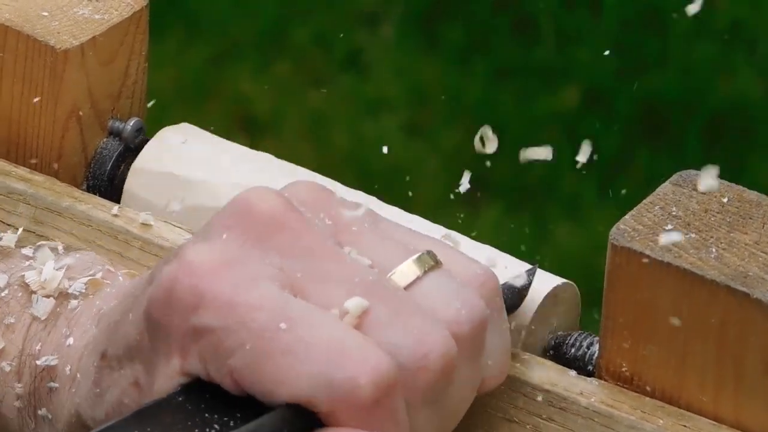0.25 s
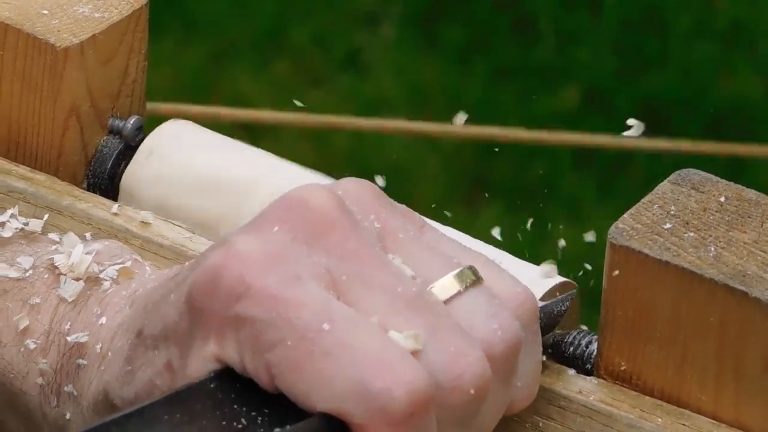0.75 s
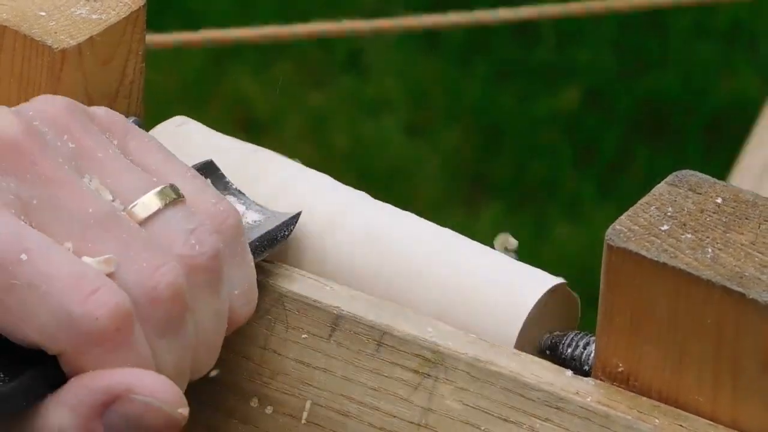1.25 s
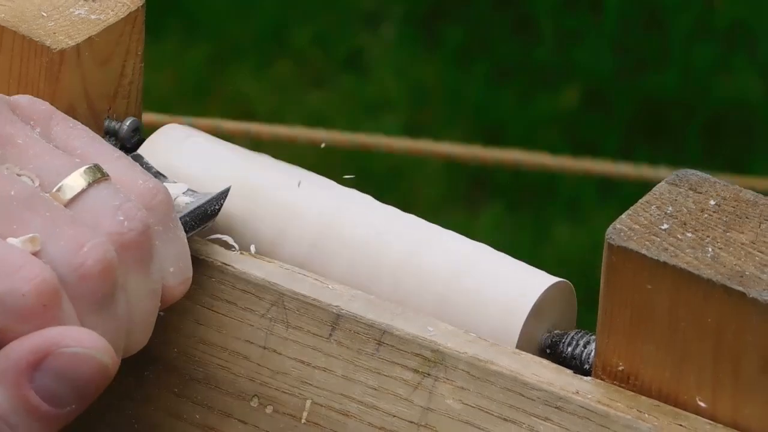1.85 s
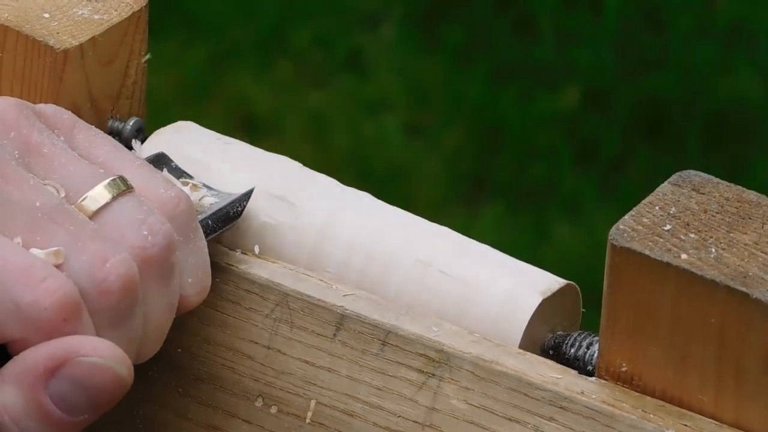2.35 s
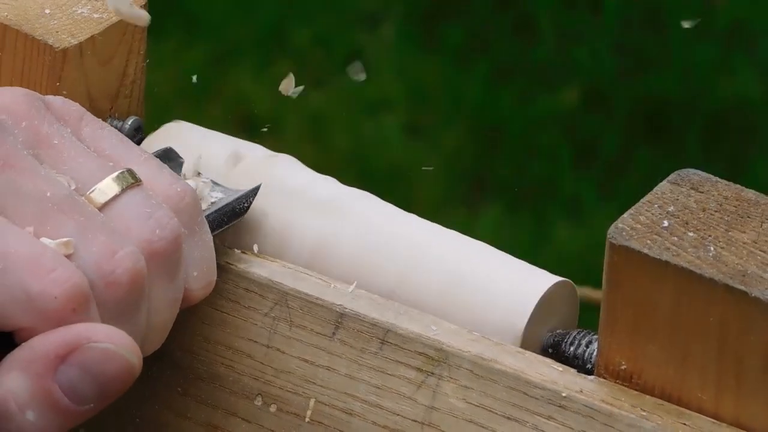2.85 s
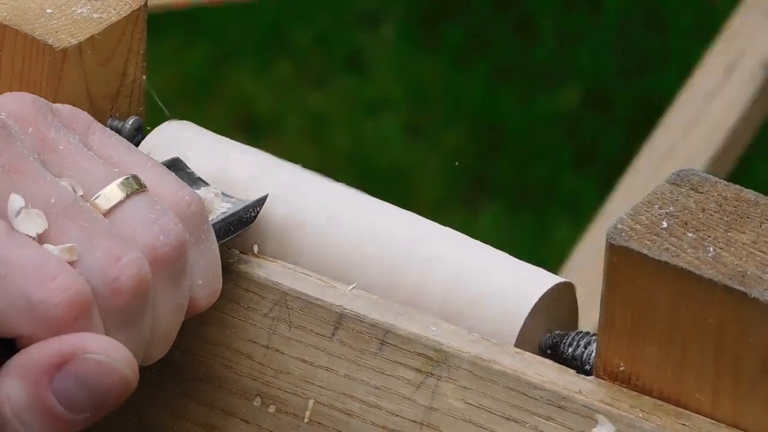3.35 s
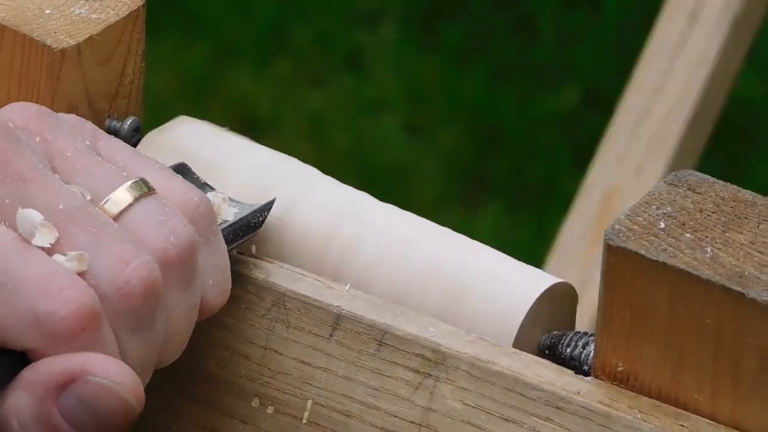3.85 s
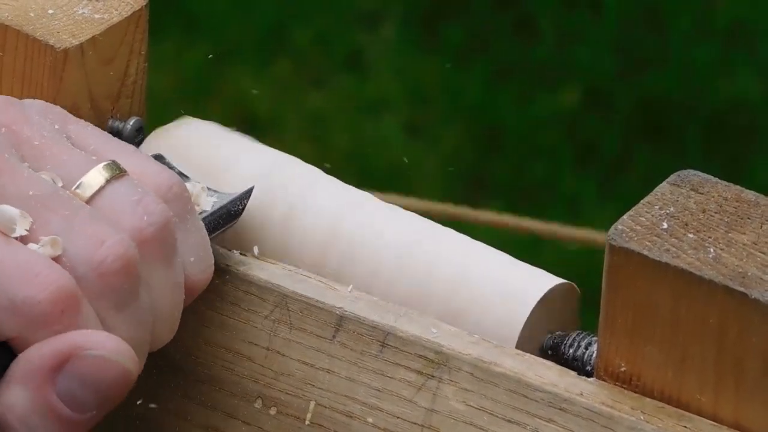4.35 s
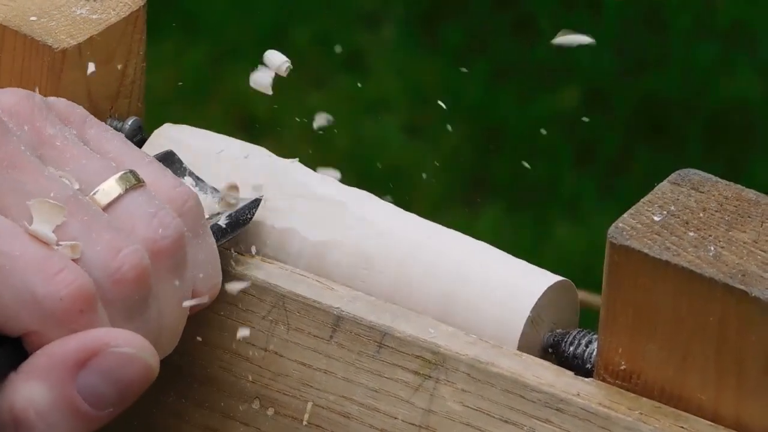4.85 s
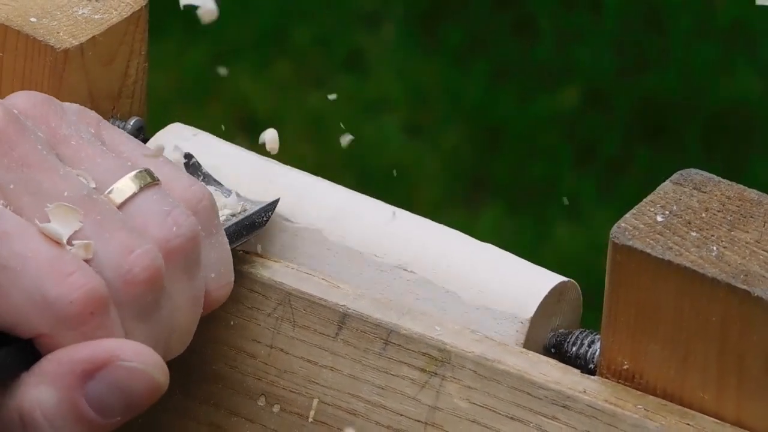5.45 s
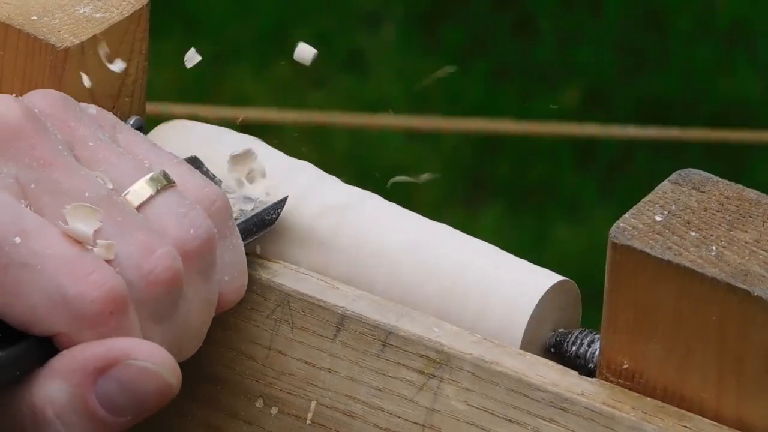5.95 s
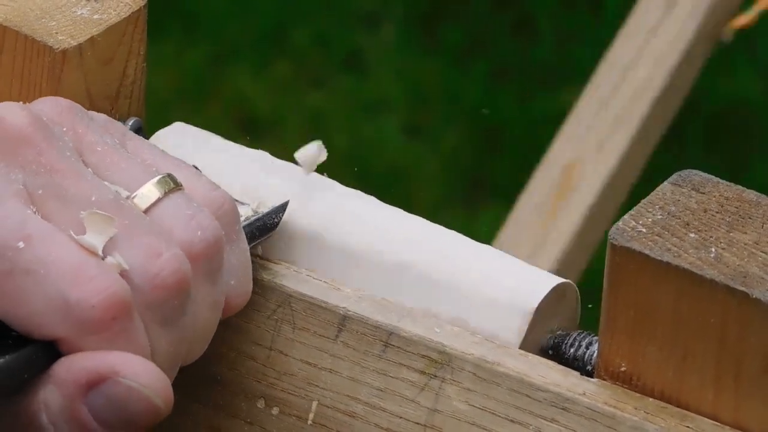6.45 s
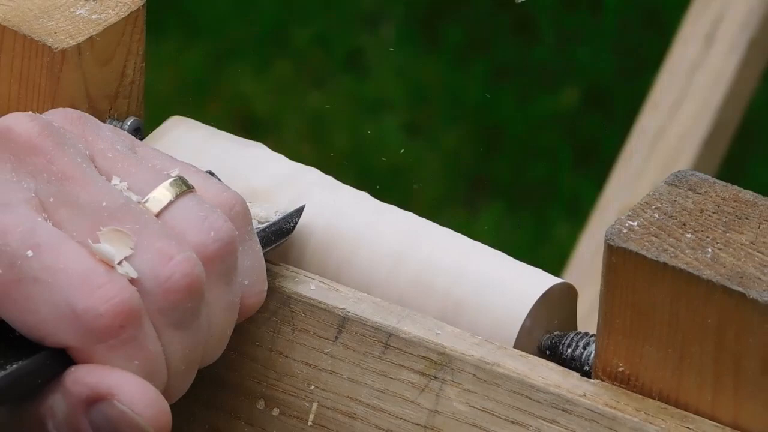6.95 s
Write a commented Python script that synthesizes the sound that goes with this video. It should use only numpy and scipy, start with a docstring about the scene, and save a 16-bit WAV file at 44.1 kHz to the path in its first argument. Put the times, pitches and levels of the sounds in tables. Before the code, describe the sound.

A gouge rasps and crackles in bursts on a spinning wooden blank, with quick knocking taps between cuts, then a power saw swells in.

```python
"""Hand-driven lathe and power saw in a garden

A gouge on a cord-driven lathe: facets bite, chips snap and fibres tear as noise through ringing wood and steel.
On each return stroke a high spot taps the edge once a turn. Chips tick, the blank squeaks; short low thumps
sound now and then. A power saw, leaning left, swells in as filtered noise; its blade later rings as wavering
sines. Shaped noise gives a faint garden rustle."""
import sys
import numpy as np
from scipy import signal
from scipy.fft import rfft, irfft
from scipy.io import wavfile
from scipy.ndimage import uniform_filter1d

SR = 44100
rng = np.random.default_rng(int(sys.argv[2]) if len(sys.argv) > 2 else 0)


def log_audio(samples):
    """Write samples as a 16-bit WAV file to the path given in sys.argv[1]."""
    # one column per channel
    frames = np.atleast_2d(samples).T
    # limit to full scale, then quantise
    limited = np.clip(frames, -1, 1)
    pcm = np.round(limited * 32767).astype(np.int16)
    wavfile.write(sys.argv[1], SR, pcm)


N = 317961
T = np.arange(N) / SR
LEFT_RIGHT = np.array([[1], [-1]])  # opposite signs left and right


def undb(db):
    """Amplitude ratio from dB."""
    return 10 ** (np.asarray(db) / 20)


def unit(x):
    """Scale to rms 1."""
    return x / np.sqrt(np.mean(x ** 2))


def curve(table):
    """Columns of a table, joined by straight lines in time."""
    s, *columns = np.transpose(table)
    return [np.interp(T, s, column) for column in columns]


def ring(x, hz, width_hz):
    """Two-pole resonance, gain 1 at the centre."""
    b, a = signal.iirpeak(hz, hz / width_hz, fs=SR)
    return signal.lfilter(b, a, x)


def band(x, lo_hz, hi_hz):
    """Band-pass: small bodies radiate no bass, and air and wood eat the top."""
    sos = signal.butter(3, [lo_hz, hi_hz], "bandpass", fs=SR, output="sos")
    return signal.sosfilt(sos, x)


def body(x, modes, side_db, shade_db=np.zeros(8)):
    """Parallel modes, neighbours leaning to opposite sides; scaled to rms 1 for unshaded white noise."""
    power = sum(undb(db) ** 2 * np.pi * width_hz / SR for hz, width_hz, db in modes)
    lean = undb(side_db) * LEFT_RIGHT
    out = 0
    for k, (hz, width_hz, db) in enumerate(modes):
        mode = undb(db) * ring(x * undb(shade_db[k]), hz, width_hz)
        out = out + mode * (1 + (-1) ** k * lean)
    return out / np.sqrt(power)


def colour(spectrum):
    """Noise with a given spectrum, straight lines over log frequency, rms 1."""
    hz, db = np.transpose(spectrum)
    log_hz = np.log(np.maximum(np.arange(N // 2 + 1) * SR / N, 1))
    gain = undb(np.interp(log_hz, np.log(hz), db, left=-70))
    return unit(irfft(rfft(rng.standard_normal(N)) * gain, N))


def walk(rate_hz):
    """Random levels held 1 / rate_hz s and slewed; spread near 1."""
    hold = int(SR / rate_hz)
    steps = np.repeat(rng.standard_normal(N // hold + 1), hold)
    return uniform_filter1d(steps, hold // 2 + 1)[:N]


# garden noise spectrum: f/Hz, relative density/dB per Hz
GARDEN_SPECTRUM = [(25, -16), (100, -8.5), (200, -12), (1000, 7.5), (2300, -5), (5000, -17), (16000, -29)]
GARDEN_DB = -48.5  # shared part, before flicker


def garden():
    """Faint flickering rustle of shaped noise, only partly alike left and right."""
    side = colour(GARDEN_SPECTRUM) * undb(-6.5) * LEFT_RIGHT
    flicker = undb(2.2 * walk(9))
    return (colour(GARDEN_SPECTRUM) + side) * undb(GARDEN_DB) * flicker


# blank and bed modes: f/Hz, width/Hz, relative level/dB
WOOD_MODES = [(598, 18, -1.5), (703.4, 84, 5.5), (942, 153, 10), (1127, 88, 9.5), (1306.5, 66, 10),
              (1787, 190, 7), (2065, 52, -4)]
# gouge shank modes, rung under load: f/Hz, width/Hz, relative level/dB
SHANK_MODES = [(1788, 400, 9.5), (2470, 940, -6), (3490, 470, 10.5)]


def wood(push, load, shade_db):
    """The blank and the bed ring under a push; under load the shank of the gouge joins in."""
    shank = band(body(push * load, SHANK_MODES, -7.0, shade_db[::-1]), 1215, 2920)
    blank = band(body(push, WOOD_MODES, -24.0, shade_db), 327, 3350)
    return blank + shank[..., ::-1, :]  # shank leans the other way


# gouge steel and chip modes: f/Hz, width/Hz, relative level/dB
STEEL_MODES = [(2820, 110, 5), (3766, 97, 10), (4600, 860, 2), (5860, 360, 8), (12400, 7500, -13)]


def steel(push, shade_db):
    """Noise under a push makes the edge sing, partly unlike left and right."""
    grain = rng.standard_normal((2, *push.shape))
    alike = body(push * grain[0], STEEL_MODES, -43, shade_db)
    apart = undb(-1.5) * body(push * grain[1], STEEL_MODES, -32, shade_db) * LEFT_RIGHT
    return band(alike + apart, 1540, 11940)


# cutting strokes: start/s, end/s, drive level/dB, steel re wood/dB, shank load/0-1
CUTS = [(0, 0.042, -30, -20, 0.6), (0.119, 0.279, -29.5, -8, 0.67), (0.753, 0.921, -29.5, -7, 0.33),
        (1.593, 1.696, -30, -19, 0.65), (2.2, 2.337, -35, -22, 0.2), (2.627, 2.728, -34, -16, 0.66),
        (2.796, 2.982, -28.5, -16, 0.64), (3.451, 3.571, -34.5, -14, 0.53), (4.088, 4.206, -34.5, -19, 0),
        (4.747, 4.918, -27.5, -15, 0.98), (5.334, 5.509, -29, -18, 1), (5.955, 6.136, -27.5, -22, 1),
        (6.565, 6.709, -24, -40, 0.84), (7.128, 7.227, -27.5, -34, 1)]
# return strokes, one row each: t/s of every tap, one tap a turn
RETURN_TAPS = [(0.497, 0.549, 0.598, 0.653), (1.177, 1.256, 1.317, 1.386), (1.864, 1.945, 1.997, 2.052),
               (2.524, 2.572, 2.615, 2.66), (3.093, 3.161, 3.205, 3.247, 3.29),
               (3.735, 3.792, 3.833, 3.874, 3.919), (4.422, 4.468, 4.509, 4.557), (5.057, 5.108, 5.156),
               (5.642, 5.685, 5.726, 5.77), (6.223, 6.288, 6.336, 6.381), (6.829, 6.888, 6.936, 6.986)]
BRUSH_DB, BRUSH_STEEL_REL_DB, BRUSH_LOAD = -37, -23.5, 0.11  # light rubbing on the return
BRUSH_LEAD_S, BRUSH_TRAIL_S = 0.022, 0.027  # before the first tap, after the last
START_S, FADE_S = 0.0055, 0.014  # linear onset; decay constant and length of the final ramp
COAST_DB, COAST_S = -11, .055  # faint rubbing after a stroke
LIFT_SHARE, LIFT_DB = 0.54, -9.5  # edge bounces clear for this share of the turn


def edge_contact():
    """Drive on wood and steel and shank load: firm start, short fade, faint coasting, dips after taps."""
    wood_drive, steel_drive, load = np.zeros(N), np.zeros(N), np.zeros(N)
    brushes = [(taps_s[0] - BRUSH_LEAD_S, taps_s[-1] + BRUSH_TRAIL_S, BRUSH_DB, BRUSH_STEEL_REL_DB, BRUSH_LOAD)
               for taps_s in RETURN_TAPS]
    for start_s, end_s, db, steel_rel_db, share in CUTS + brushes:
        after = np.maximum(T - end_s, 0)
        onset = np.clip((T - start_s) / START_S, 0, 1)
        coast = undb(COAST_DB) * np.clip((COAST_S - after) / FADE_S, 0, 1)
        on = onset * np.maximum(np.exp(-after / FADE_S), coast)
        wood_drive += undb(db) * on
        steel_drive += undb(db + steel_rel_db) * on
        load = np.maximum(load, share * (T > start_s - START_S) * (after < COAST_S))
    clear = np.zeros(N)
    for taps_s in RETURN_TAPS:
        for s, turn_s in zip(taps_s, np.gradient(taps_s)):
            clear += (T > s) & (T < s + LIFT_SHARE * turn_s)
    bounce = undb(LIFT_DB * uniform_filter1d(clear, size=200))
    return wood_drive * bounce, steel_drive * bounce, load


SHADE_DB, SHADE_RATE_HZ = 3.3, 60  # spread of mode weights; how often they shift in a stroke


def shifting():
    """Weight of each mode (dB) as the edge travels over the grain."""
    return [SHADE_DB * walk(SHADE_RATE_HZ) for _ in range(8)]


CRACKLE_DB = 2.5  # scale of the exponential spread of cracks


def tearing(wood_drive, steel_drive, load):
    """Fibres let go in clumps of tiny cracks, so the tearing stutters and crackles."""
    cracks = unit(rng.standard_normal(N) * undb(CRACKLE_DB * rng.exponential(size=N)))
    clumps = undb(2.2 * walk(70) - 2.0)
    rasp = wood(wood_drive * clumps * undb(2.63 * walk(300)) * cracks, load, shifting())
    hiss = steel(steel_drive * clumps * undb(2.7 * walk(400)), shifting())
    return rasp + hiss


# chips snapping off: t/s, level before band-pass/dB, f/Hz, decay constant/ms
SNAPS = [(0.035, -5.5, 1810, 1.13), (1.3397, -16, 3580, 2.2), (2.183, -6.5, 3100, .7),
         (2.6342, 1, 2870, 0.62), (2.918, 0.5, 2560, 0.7), (3.309, -13.5, 3630, 1.2),
         (4.8707, -1, 1990, 0.91), (5.456, 2, 2280, 0.68), (6.603, -4.5, 1240, 1), (6.687, 1.5, 1010, 0.86)]


def snaps():
    """One sharp click each into the chip's short ring, roughened as the fibres part."""
    out, t = np.zeros(N), T[:SR // 50]
    rough = 1 + 0.2 * rng.standard_normal((len(SNAPS), len(t)))
    for (s, db, hz, decay_ms), grit in zip(SNAPS, uniform_filter1d(rough, size=4)):
        i = int(s * SR)
        envelope = (1 - np.exp(-t / 0.000082)) * np.exp(-1000 * t / decay_ms)
        out[i:i + len(t)] += undb(db) * envelope * grit * np.sin(2 * np.pi * hz * t)
    return band(out, 590, 9500)


TAP_HZ, TAP_SPREAD, TAP_GRIT_DB = 950, .07, 13  # mean pitch, relative spread, noise gain


def strikes(rows, load, wood_s, edge_s, lag_s=0, blunt=False):
    """Noise pushes ring wood and steel for milliseconds; a blunt push adds a sine near one pitch."""
    out, t = np.zeros((2, N + SR)), T[:SR // 20]
    starts = [int((s - .001) * SR) for s, wood_db, edge_db in rows]
    stretch = undb(0.95 * rng.standard_normal((len(rows), 1, 1)))  # durations vary
    late = np.maximum(t - lag_s, 0)
    swell = late * np.exp(-late / (wood_s * stretch))
    push = swell * rng.standard_normal((len(rows), 1, len(t)))
    if blunt:
        hz = TAP_HZ * (1 + TAP_SPREAD * rng.standard_normal((len(rows), 1, 1)))
        push = undb(TAP_GRIT_DB) * push + swell * np.sin(2 * np.pi * hz * t)
    # each contact point favours other modes; axes: mode, wood or steel, row
    shade_db = SHADE_DB * rng.standard_normal((8, 2, len(rows)))[..., None, None]
    knocks = wood(push, load[starts][:, None, None], shade_db[:, 0])
    scuff = (1 - np.exp(-t / 0.00039)) * np.exp(-(t / (2 * edge_s * stretch)) ** 2)
    ticks = steel(scuff, shade_db[:, 1])
    for (s, wood_db, edge_db), i, knock, tick in zip(rows, starts, knocks, ticks):
        out[:, i:i + len(t)] += undb(wood_db) * knock / np.abs(knock).max()
        out[:, i:i + len(t)] += undb(edge_db) * tick / np.abs(tick).max()
    return out[:, :N]


# edge digs into a facet: t/s, wood peak/dB, steel peak/dB (before bench smear and lean)
BITES = [(0.114, -14, -35), (0.135, -29, -39), (0.162, -16.5, -16), (0.186, -16.5, -18), (0.226, -22, -16),
         (0.754, -17.5, -28), (0.816, -20.5, -24), (0.846, -16, -17), (0.862, -24, -14.5),
         (0.895, -32, -29), (1.401, -24, -32), (1.503, -21.5, -32), (1.527, -29, -36), (1.562, -24, -30),
         (1.582, -21, -21.5), (1.608, -14.5, -20.5), (1.627, -14, -21), (1.638, -14, -32),
         (1.659, -21, -21), (1.686, -15.5, -28), (2.184, -10.5, -29), (2.213, -18.5, -30),
         (2.253, -18, -26), (2.287, -16, -22), (2.336, -19.5, -33), (2.634, -8, -24), (2.677, -10, -24),
         (2.683, -8, -25), (2.817, -11, -17.5), (2.857, -31, -12), (2.889, -8.5, -11), (2.909, -10.5, -15),
         (2.933, -10.5, -18), (2.958, -17, -15.5), (3.446, -16, -16), (3.478, -15, -17), (3.495, -13, -22),
         (3.522, -18.5, -19.5), (4.096, -21.5, -26), (4.128, -18, -22), (4.16, -17.5, -23),
         (4.192, -24, -22.5), (4.76, -5.5, -19), (4.777, -4, -12), (4.807, -6.5, -34), (4.856, -13, -19),
         (5.353, -36, -13), (5.374, -11.5, -36), (5.388, -33, -13), (5.42, -35, -10), (5.473, -8.5, -17.5),
         (5.943, -26, -14), (5.954, -24, -14), (5.976, -10.5, -19), (5.995, -17, -12), (6.017, -7, -22),
         (6.04, -16, -16.5), (6.049, -14, -19), (6.067, -9, -18), (6.076, -9, -30), (6.092, -11, -26),
         (6.113, -23, -33), (6.452, -18, -25.5), (6.579, -6.5, -15.5), (6.61, -7.5, -19),
         (6.631, -13.5, -29), (6.656, -14, -14), (6.722, -12.5, -19.5), (6.733, -12.5, -33),
         (7.134, -14, -14.5), (7.161, -33, -22), (7.185, -10.5, -19)]


def bites(load):
    """Facets scuff the edge: the steel answers at once, the wood swells after it."""
    return strikes(BITES, load, wood_s=0.0022, edge_s=0.0027)


# loose chips tick on the bench: t/s, peak before bench smear and lean/dB
CHIPS = [(0.433, -42), (0.997, -38), (1.006, -36), (1.742, -29.5), (1.79, -33), (1.8, -36), (1.837, -37),
         (3.041, -33)]
CHIP_HZ, CHIP_DECAY_S = 4300, 0.0019


def chips():
    """Short bright noise ticks with a broad ring."""
    out, t = np.zeros(N), T[:SR // 50]
    grain = rng.standard_normal((len(CHIPS), len(t))) * np.exp(-t / CHIP_DECAY_S)
    grain = band(grain, 2500, 9300)
    for (s, db), tick in zip(CHIPS, grain + 2 * ring(grain, CHIP_HZ, 900)):
        out[int(s * SR):][:len(t)] += undb(db) * tick / np.abs(tick).max()
    return out


TURN_S = .05  # reference time of one turn
TAP_DB, TAP_DB_PER_OCTAVE = -15, 5.5  # wood at the reference turn; rise for twice the speed
LAST_TAP_DB = -2.5  # added to wood, the blank is stopping
TAP_EDGE_DB, EDGE_FADE_DB = -16.5, -1.5  # steel at the first tap; change per tap


def taps(load):
    """A high spot hits once a turn: faster turns knock harder, and the gouge is eased off from tap to tap."""
    rows = []
    for taps_s in RETURN_TAPS:
        for k, (s, turn_s) in enumerate(zip(taps_s, np.gradient(taps_s))):
            wood_db = TAP_DB + TAP_DB_PER_OCTAVE * np.log2(TURN_S / turn_s)
            wood_db += LAST_TAP_DB * (s == taps_s[-1])
            rows.append((s, wood_db, TAP_EDGE_DB + EDGE_FADE_DB * k))
    return strikes(rows, load, wood_s=.0026, edge_s=.0012, lag_s=.001, blunt=True)


def gouge():
    """Tearing, snaps, bites, chips and taps, with a short noise smear from the bench."""
    wood_drive, steel_drive, load = edge_contact()
    dry = tearing(wood_drive, steel_drive, load) + snaps() + bites(load) + chips() + taps(load)
    tail = rng.standard_normal((2, SR // 10)) * np.exp(-T[:SR // 10] / 0.011) * undb(-35.0)
    smear = signal.fftconvolve(dry, tail, axes=1)[:, :N]
    return (dry + smear) * undb(1.2 * LEFT_RIGHT)


# blank squeaks on its centres: t/s, length/s, start f/Hz, end f/Hz, peak/dB
SQUEAKS = [(1.8, .04, 2370, 2270, -47), (1.895, .1, 2320, 2510, -42), (2.55, .025, 2600, 2550, -43),
           (2.72, .055, 2350, 2290, -43), (1.845, .09, 2680, 2950, -50)]


def squeaks():
    """Thin gliding sine whistles of dry metal on wood."""
    out = np.zeros(N)
    for s, length_s, start_hz, end_hz, db in SQUEAKS:
        u = np.clip((T - s) / length_s, 0, 1)
        phase = 2 * np.pi * np.cumsum(start_hz + (end_hz - start_hz) * u) / SR
        out += undb(db) * np.abs(np.sin(np.pi * u)) ** 0.62 * np.sin(phase)
    return out


# low thumps: t/s, peak/dB
THUMPS = [(2.638, -36), (2.913, -36.5), (4.78, -29.5), (4.869, -29.5), (5.471, -37), (5.99, -40),
          (6.581, -33.5)]
THUMP_S, THUMP_APART_DB = .006, -3  # envelope rise and decay constant; part unlike left and right


def thumps():
    """Short low noise thumps, partly unlike left and right."""
    out, t = np.zeros((2, N + SR)), T[:SR // 20]
    thump = rng.standard_normal((len(THUMPS), 2, len(t))) * t * np.exp(-t / THUMP_S)
    for (s, db), (mid, side) in zip(THUMPS, band(thump, 17, 340)):
        both = mid + undb(THUMP_APART_DB) * side * LEFT_RIGHT
        out[:, int((s - THUMP_S) * SR):][:, :len(t)] += undb(db) * both / np.abs(both).max()
    return out[:, :N]


SKIRT_DB, SKIRT_HZ = -4, 130  # hiss level re the unwavered sine, width


def blade_mode(hz):
    """A wavering pure ring inside a narrow rough hiss."""
    pure = np.sqrt(2) * np.sin(2 * np.pi * (hz * T + rng.random())) * undb(2 * walk(12))
    return pure + undb(SKIRT_DB) * unit(ring(rng.standard_normal(N), hz, SKIRT_HZ))


# saw drive: t/s, motor whirr level/dB, blade wind level/dB
SAW_LEVELS = [(3.2, -46, -62), (3.35, -33.5, -47), (4.0, -33.5, -37), (6.6, -34, -36.5), (7.21, -33, -30.5)]
# motor housing modes: f/Hz, width/Hz, relative level/dB
WHIRR_MODES = [(1040, 1040, 16), (1500, 280, 22)]
# blade wind spectrum: f/Hz, relative density/dB per Hz
WIND_SPECTRUM = [(2000, 5), (4500, 7), (7000, 0), (10000, -5.5), (16000, -16.5)]
# blade modes: f/Hz, level before swell/dB
BLADE_MODES = [(6325, -51), (7030, -50), (7574, -43), (8339, -54), (8586, -54), (9283, -53), (9372, -53),
               (9418, -53), (11009, -60), (11709, -60)]
# swell of the blade ring: t/s, gain/dB
RING_SWELL = [(6.7, -30), (6.88, -12), (7.0, -1)]
WHINE_HZ, WHINE_DB, WHINE_START_S, WHINE_DECAY_S = 1730, -40, 3.3, .8  # levels before the lean
SAW_LAG_SAMPLES, SAW_LEAN_DB, SAW_SIDE_DB = 5, 1.7, -7  # right lags; left up and right down; unlike part


def saw():
    """Noise through the housing, wind of the teeth, fading rough whine and the plate's modes, left first."""
    whirr_db, wind_db = curve(SAW_LEVELS)
    flutter_db = 1.2 * walk(11)

    def motor():
        housing = body(rng.standard_normal(N), WHIRR_MODES, side_db=-44)[0]
        return band(housing, 495, 2590) * undb(whirr_db + flutter_db)

    def wind():
        return colour(WIND_SPECTRUM) * undb(wind_db + 1.3 * walk(7.2))

    plate = sum(undb(db) * blade_mode(hz) for hz, db in BLADE_MODES) * undb(curve(RING_SWELL)[0])
    since = np.maximum(T - WHINE_START_S, 0)
    whine = unit(ring(rng.standard_normal(N), WHINE_HZ, 40)) * undb(WHINE_DB)
    whine *= np.exp(-since / WHINE_DECAY_S) * (T > WHINE_START_S)
    on = T > SAW_LEVELS[0][0]
    mid = (motor() + wind() + plate + whine) * on
    side = undb(SAW_SIDE_DB) * (motor() + wind()) * on
    lean = undb(SAW_LEAN_DB)
    return np.array([lean * (mid + side), np.roll(mid - side, SAW_LAG_SAMPLES) / lean])


def scene():
    """Sum of all sources, stereo."""
    return garden() + gouge() + squeaks() + thumps() + saw()


TOP_HZ = 16200


def record(dry):
    """Steep elliptic low-pass cuts the top."""
    sos = signal.ellip(8, .2, 70, TOP_HZ, fs=SR, output="sos")
    return signal.sosfilt(sos, dry)


dry = scene()
out = record(dry)
log_audio(out)
```